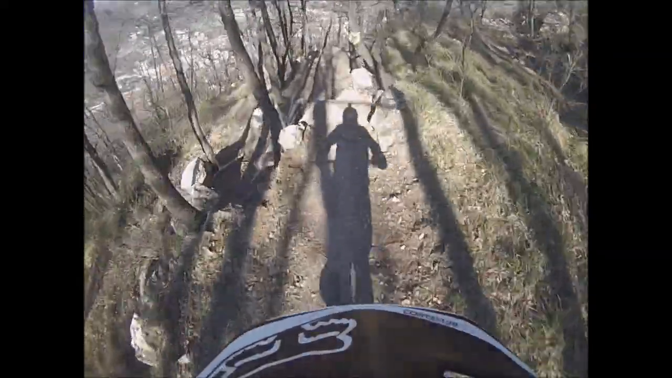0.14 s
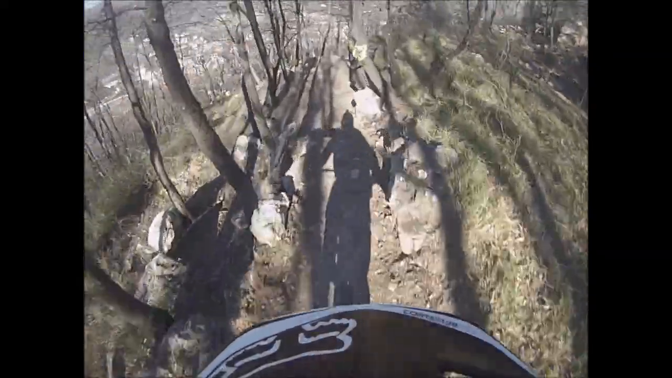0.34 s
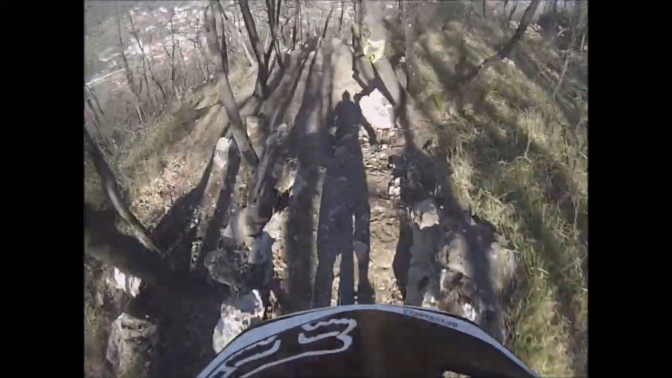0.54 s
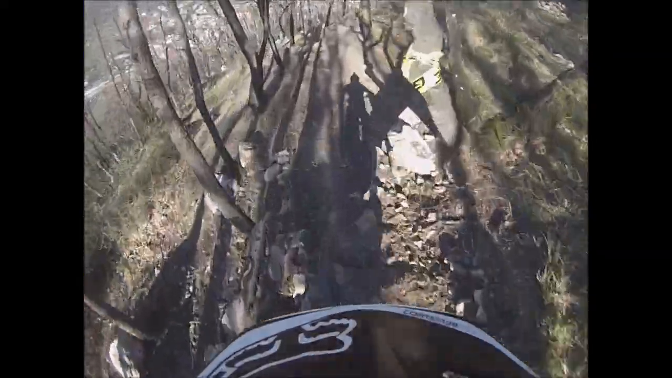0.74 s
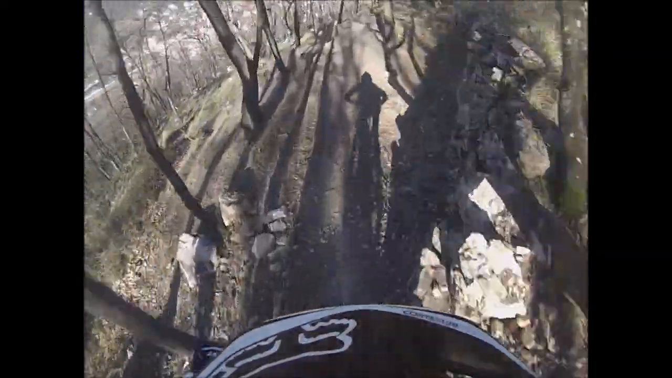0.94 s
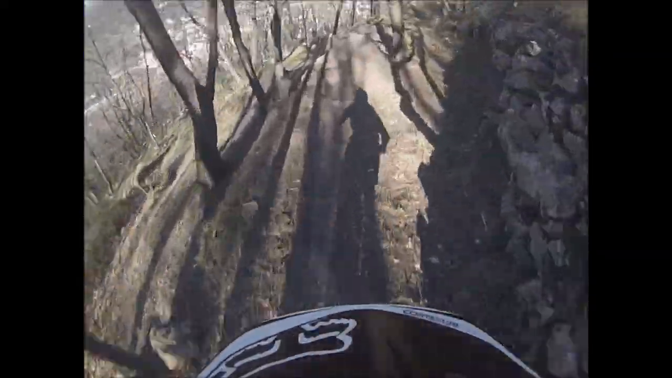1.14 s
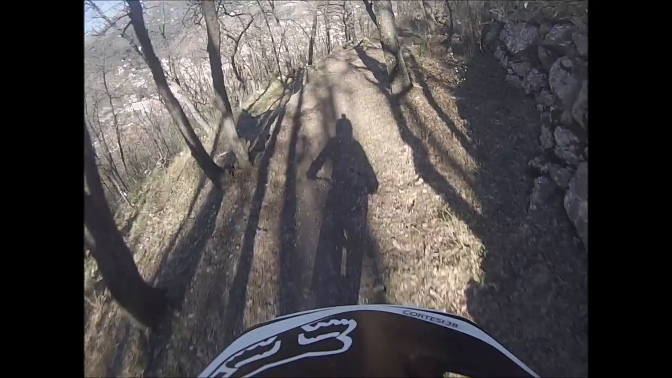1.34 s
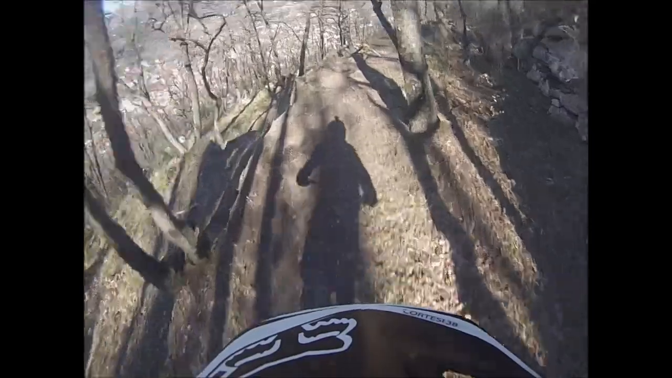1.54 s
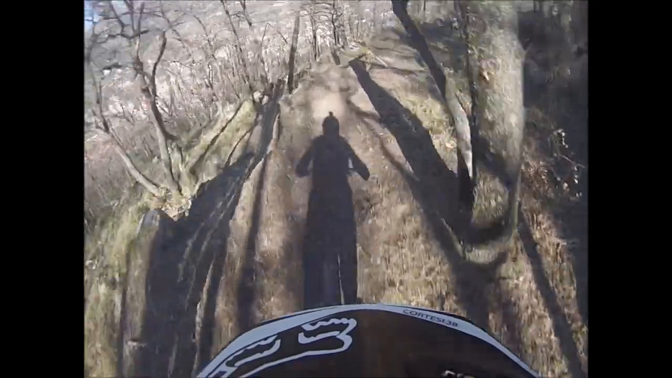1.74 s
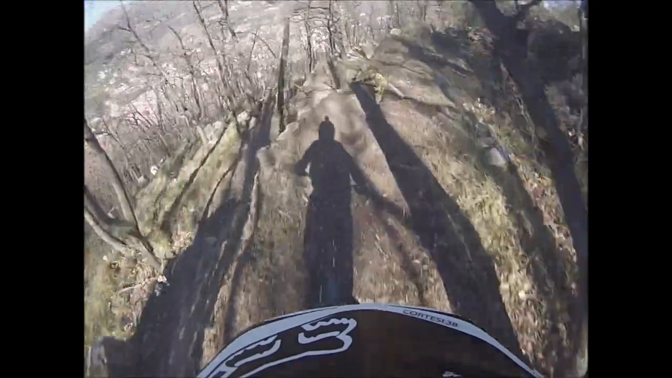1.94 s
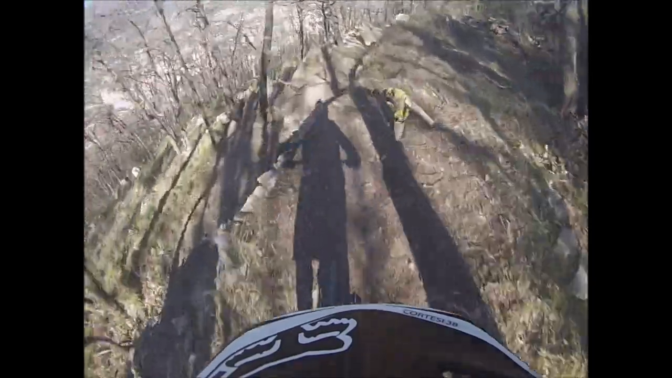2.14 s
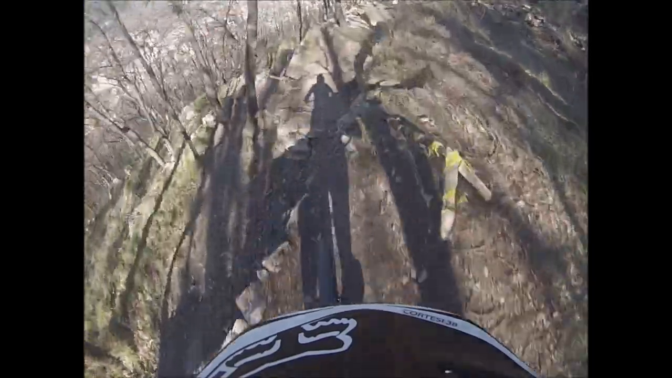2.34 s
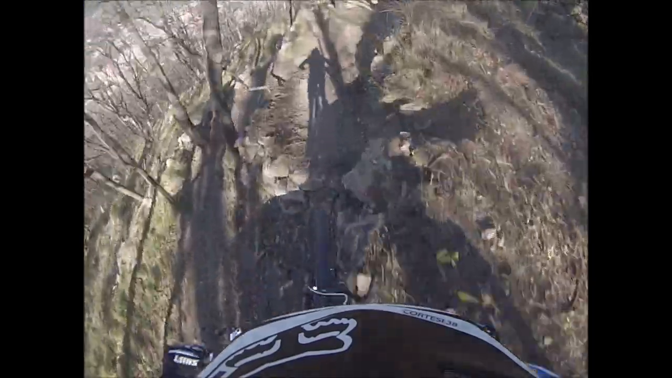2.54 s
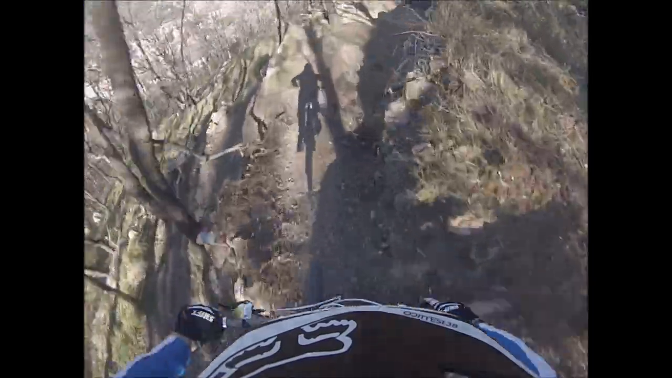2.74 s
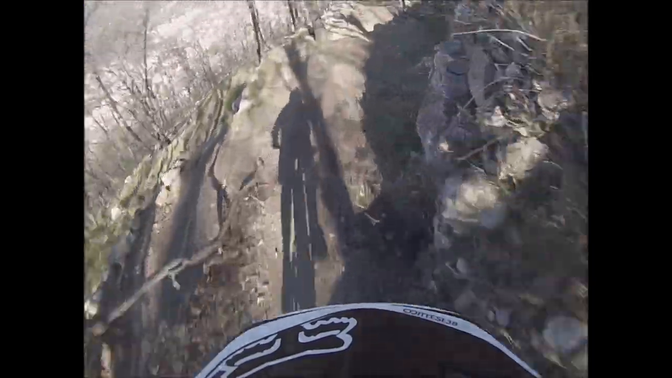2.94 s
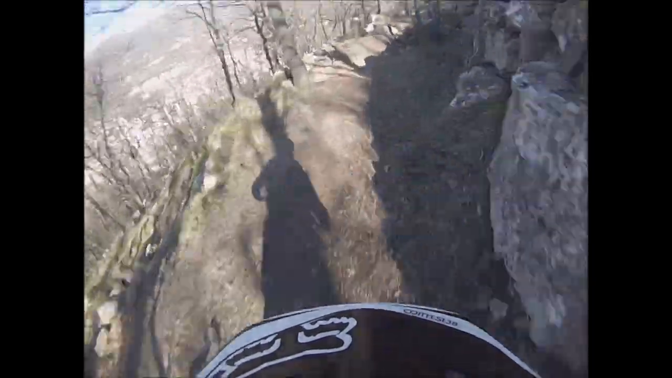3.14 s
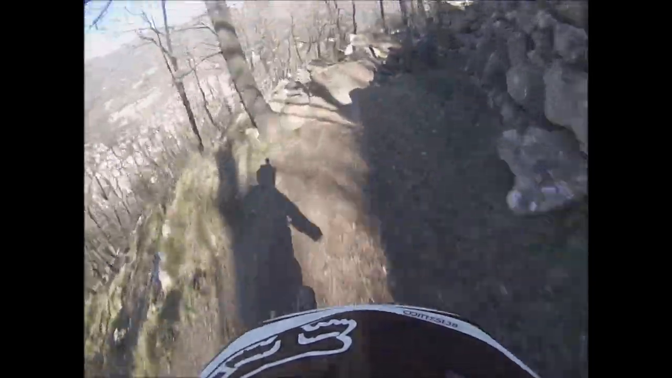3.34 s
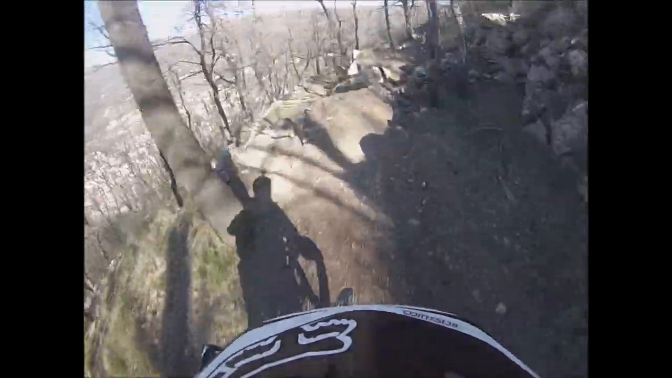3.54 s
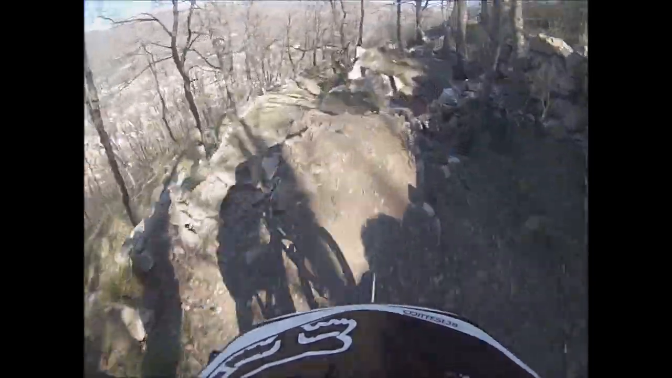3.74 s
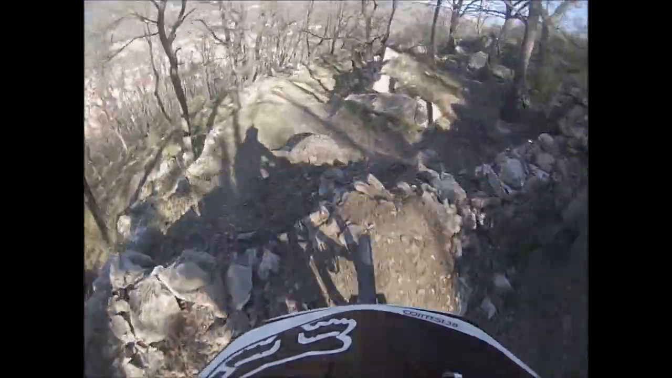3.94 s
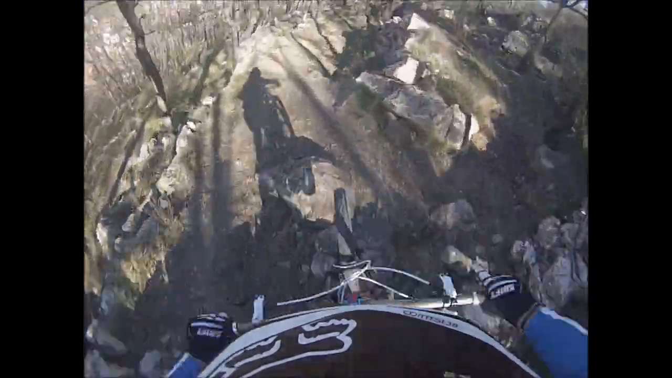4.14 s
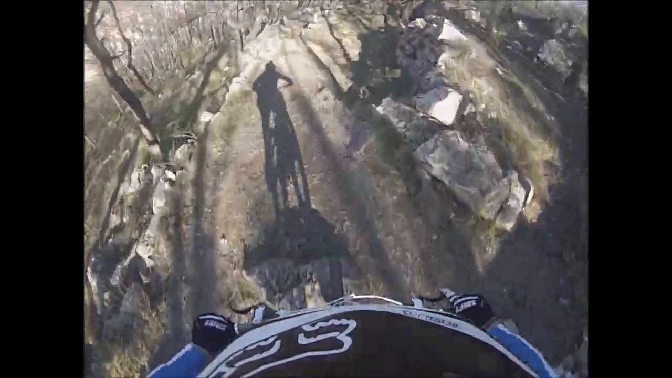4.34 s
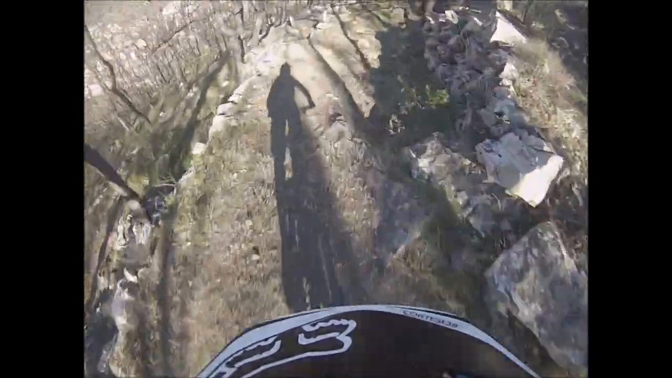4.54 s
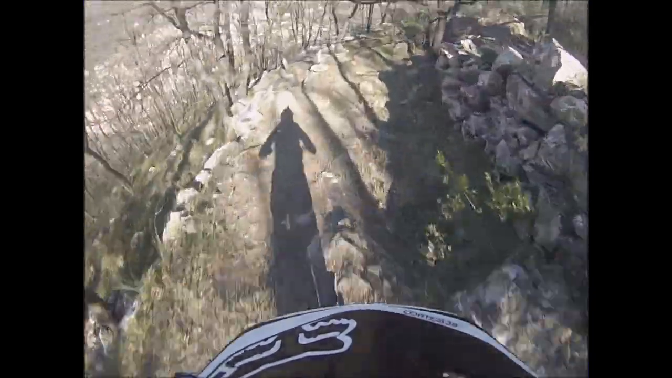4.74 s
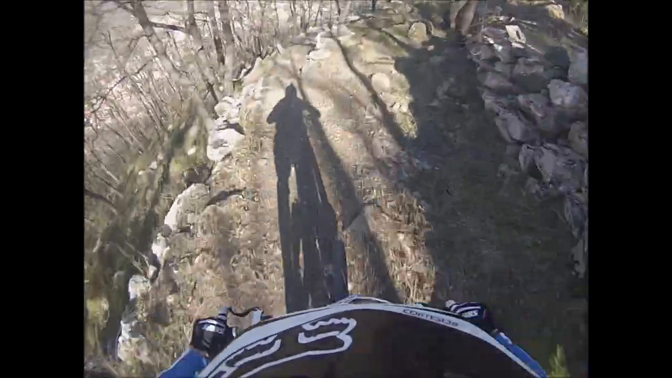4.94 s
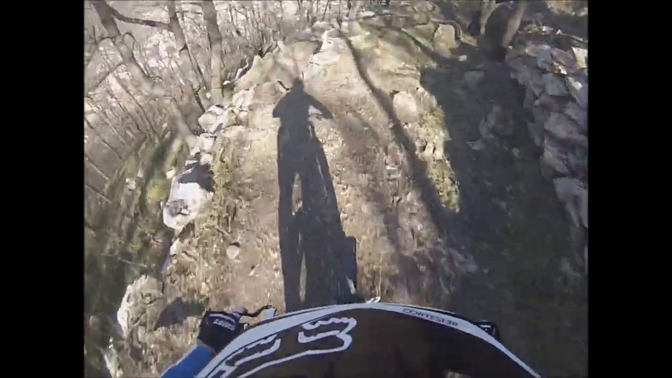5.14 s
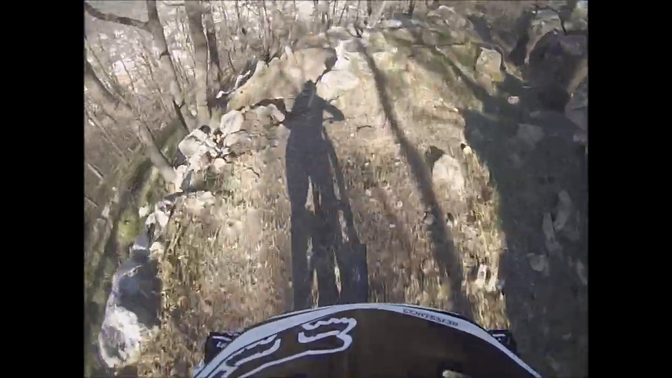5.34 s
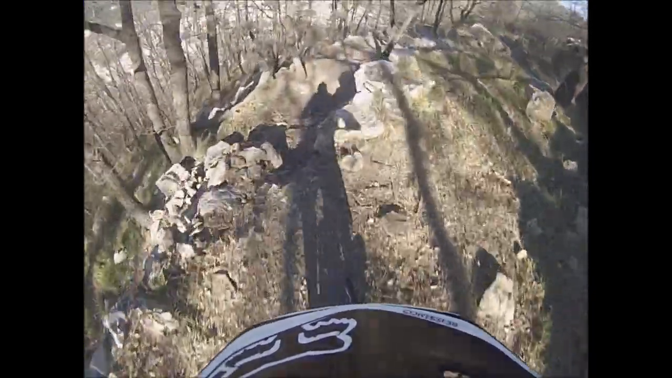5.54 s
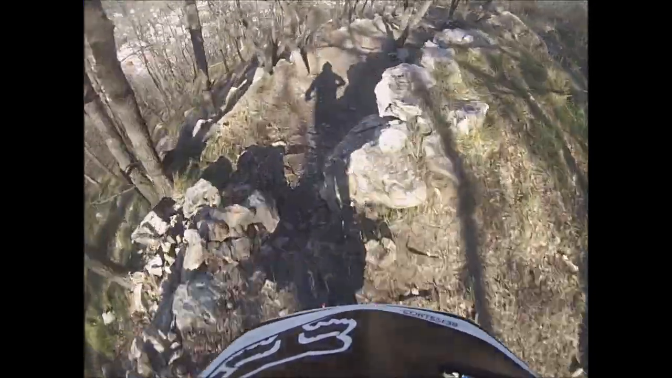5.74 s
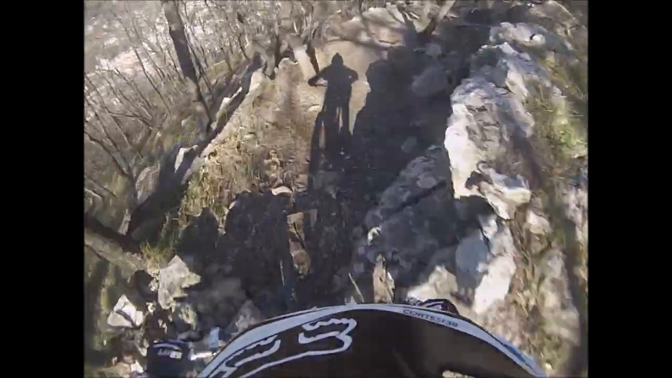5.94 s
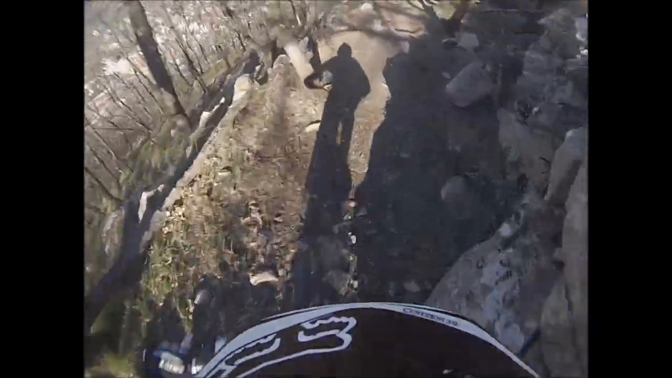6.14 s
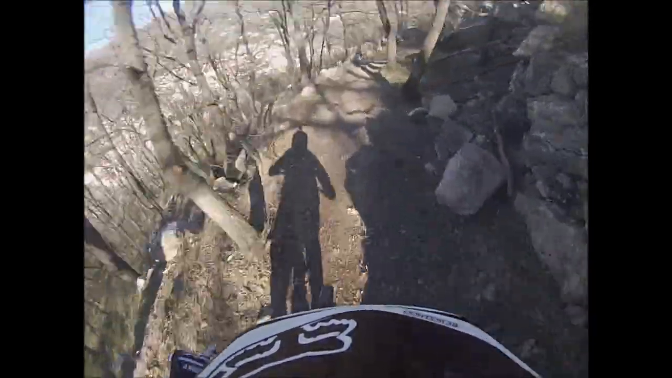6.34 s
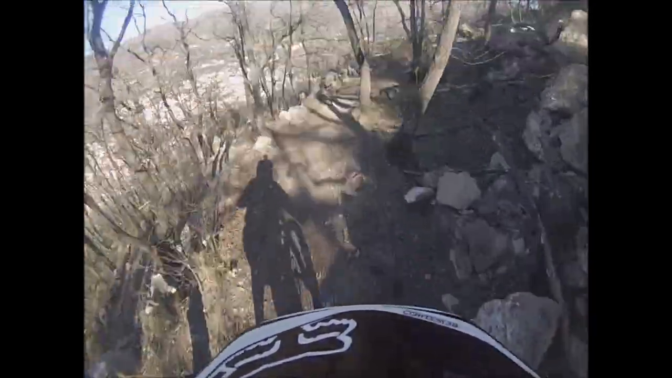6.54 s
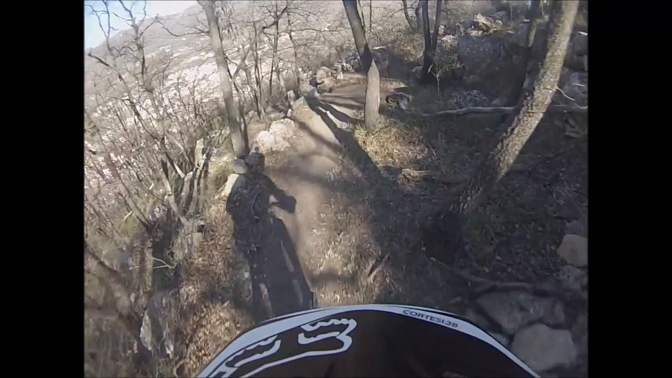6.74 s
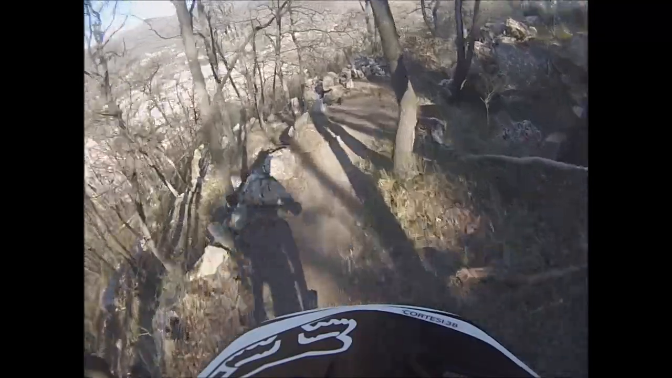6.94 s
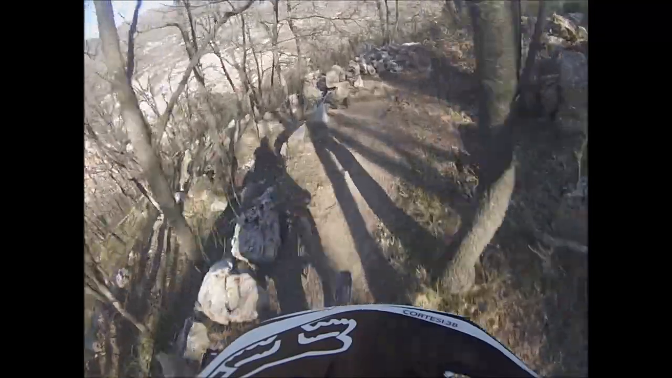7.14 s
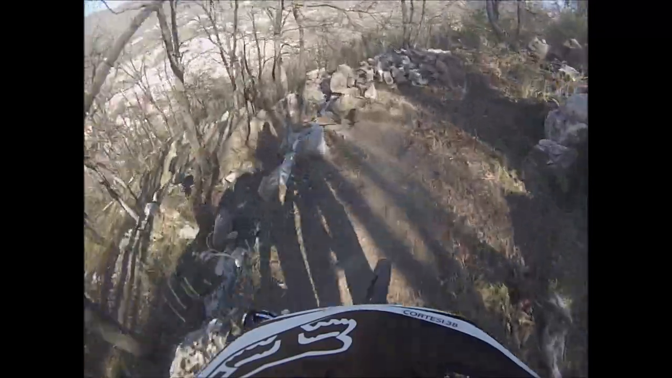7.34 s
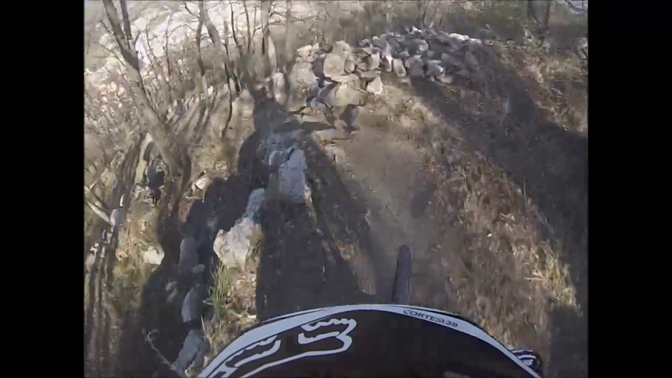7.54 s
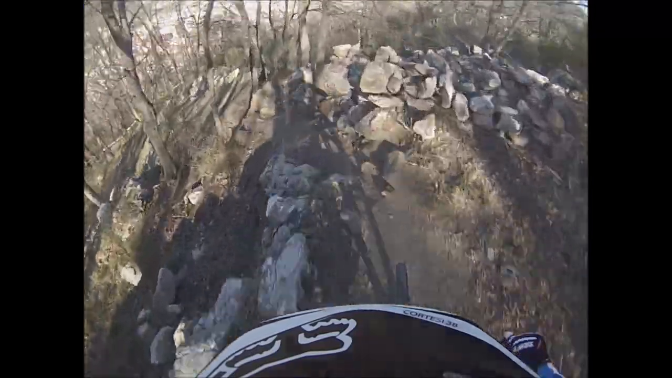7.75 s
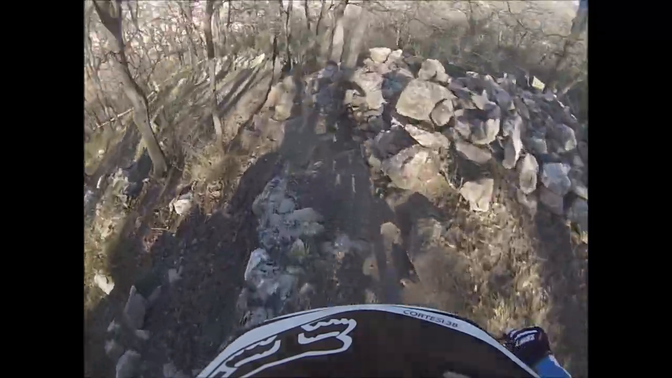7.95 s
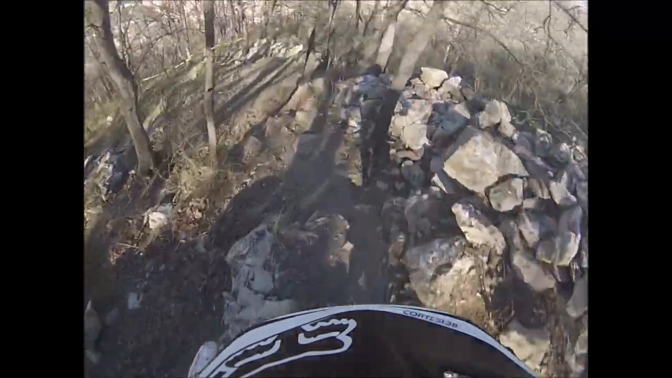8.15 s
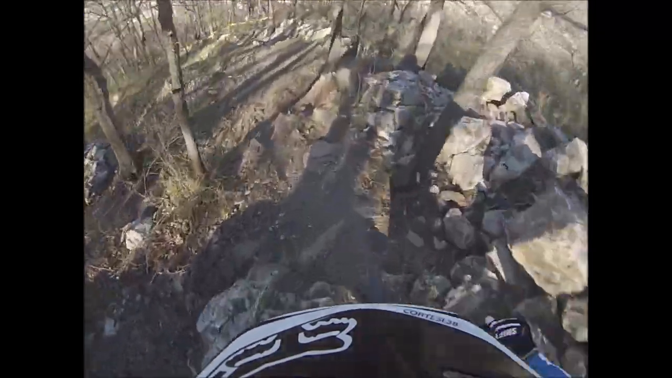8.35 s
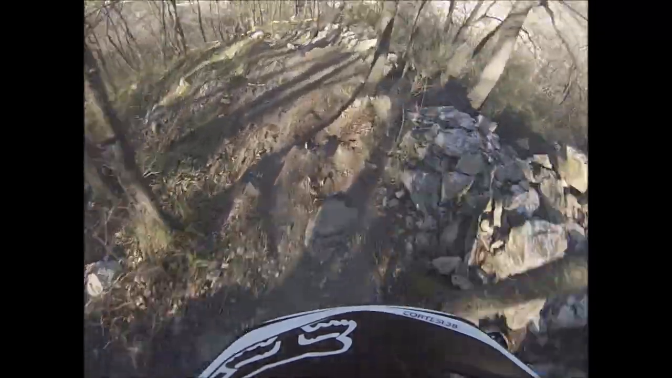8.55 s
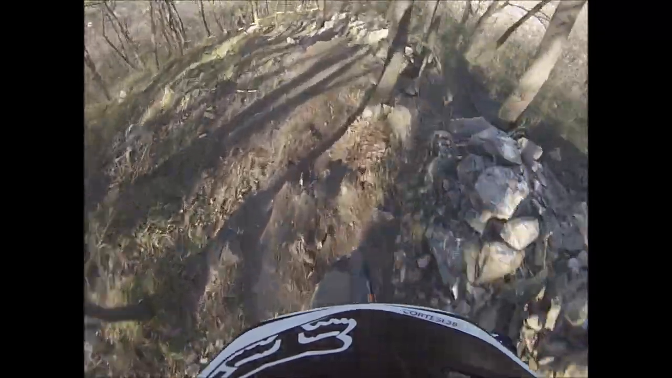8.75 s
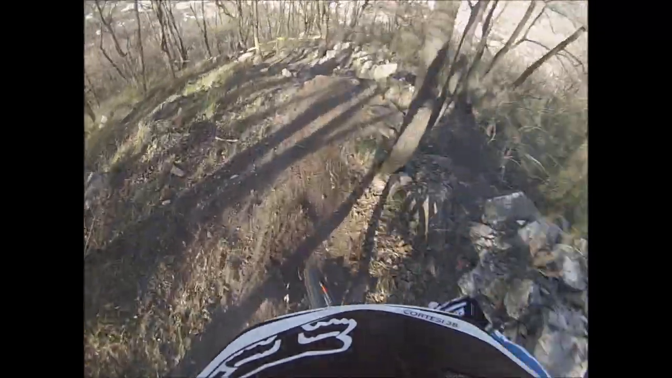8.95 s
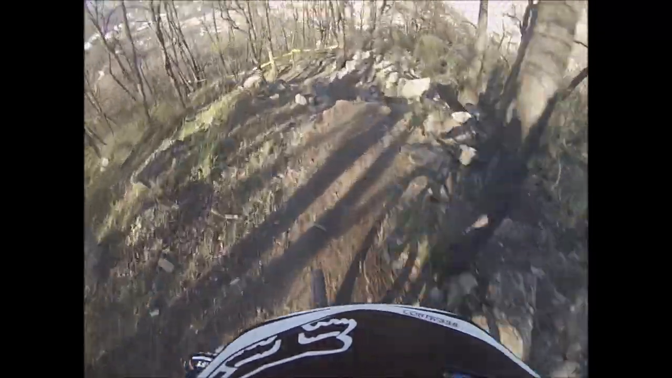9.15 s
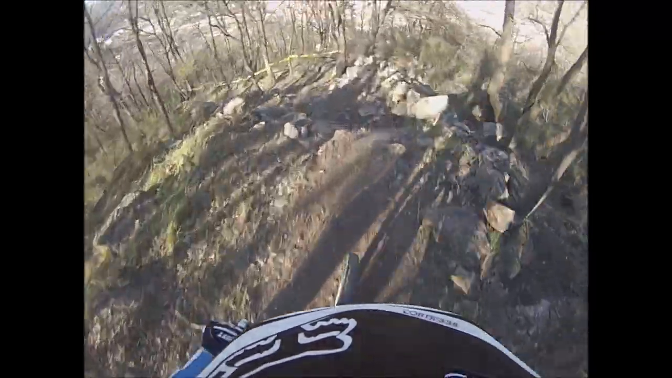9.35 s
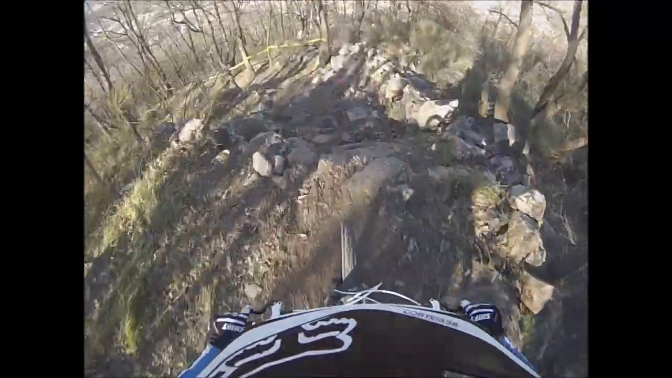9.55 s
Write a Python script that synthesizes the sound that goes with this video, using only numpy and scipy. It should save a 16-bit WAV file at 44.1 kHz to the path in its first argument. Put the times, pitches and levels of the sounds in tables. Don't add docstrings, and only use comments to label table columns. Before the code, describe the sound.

A mountain bike clatters down a rocky woodland trail, deep thuds and hard plasticky knocks jolting the rider's helmet camera over muffled tyre roar and wind.

```python
import sys
import numpy as np
from scipy import signal
from scipy.fft import rfft, irfft
from scipy.io import wavfile
from scipy.ndimage import uniform_filter1d

SR = 44100
rng = np.random.default_rng(int(sys.argv[2]) if len(sys.argv) > 2 else 0)


def makeup_ratio(level_db):
    decades = np.asarray(level_db, float) / 20
    return 10 ** decades


def generate_wav(signal):
    frames = np.transpose(np.atleast_2d(signal))
    scaled = np.clip(frames, -1, 1) * 32767
    pcm = np.round(scaled).astype(np.int16)
    wavfile.write(sys.argv[1], SR, pcm)


N = 427329


def rms_one(x):
    return x / np.sqrt(np.mean(x ** 2) + 1e-20)


def band(x, low_hz, high_hz, order=2):
    return signal.sosfilt(signal.butter(order, [low_hz, high_hz], "band", fs=SR, output="sos"), x + 1e-18)


def drift(rate):
    r = np.exp(-80 * np.pi * rate / SR)
    noise = rng.standard_normal(N // 40 + 2002)
    slow = signal.lfilter([1], [1, -2 * r, r * r], noise)[2000:]
    return np.interp(np.arange(N) / 40, np.arange(len(slow)), rms_one(slow))


def add(out, s, piece):
    i = max(round(s * SR), 0)
    out[i:i + len(piece)] += piece[:N - i]


def in_time(rows):
    s, *columns = np.transpose(rows)
    return [np.interp(np.arange(N) / SR, s, c) for c in columns]


def add_swings(curve_db, spans, taper):
    for middle_s, length_s, change_db in spans:
        swing = change_db * signal.windows.tukey(round(length_s * SR), taper)
        add(curve_db, middle_s - length_s / 2, swing)


def narrow_hiss(spans, low_hz, high_hz):
    gate = np.zeros(N)
    for s, length_s, level_db in spans:
        add(gate, s, makeup_ratio(level_db) * np.hanning(round(length_s * SR)))
    return gate * makeup_ratio(2 * drift(120)) * rms_one(band(rng.standard_normal(N), low_hz, high_hz))


# start_s, level_db, gravel_looseness_db
RIDE = [(0, -53.5, 1), (.42, -57, -1.5), (1.1, -48.5, 1), (1.55, -60, -0.5), (1.86, -50.5, 1.5),
        (2.4, -54.5, 0.5), (2.9, -53, 1), (3.3, -55, 0), (3.85, -57, 0.5), (4.2, -67, 2.5), (4.5, -57, 1.5),
        (5.15, -57.5, -2), (5.5, -73.5, -6.5), (6.2, -54, 0.5), (6.6, -69.5, -4.5), (7.5, -56, 2.5),
        (8.4, -67, -2), (9.69, -61.5, 0.5)]
# middle_s, length_s, roar_change_db
SCRAPES = [(1.085, 0.092, -3.5), (2.742, 0.076, 7.5), (2.916, 0.23, 7.5), (1.02, 0.063, 5.5),
           (4.997, 0.06, 6), (2.948, 0.081, 3.5), (5.121, 0.037, -8.5), (5.173, 0.047, 2),
           (8.287, 0.024, -4.5), (8.417, .015, 12), (3.263, 0.23, -4.5), (4.141, 0.054, 5.5),
           (4.388, 0.2, 8), (4.554, 0.04, 18.5), (4.598, 0.037, 10), (4.46, 0.017, 12), (4.748, 0.11, 2),
           (5.83, 0.046, 4), (5.925, 0.06, 9.5), (6.089, 0.079, 13), (6.065, 0.092, 7), (8.262, .025, 4.5),
           (6.174, 0.051, 7), (6.31, 0.066, -4.5), (6.852, 0.32, 6), (7.108, 0.11, -8), (7.553, 0.14, -6),
           (7.818, 0.14, 5.5), (7.955, 0.1, -6), (8.237, 0.33, 8), (8.409, 0.065, -12), (8.642, 0.4, 6),
           (8.823, 0.066, 10), (9.2, 0.025, 11.5), (9.332, 0.15, -4.5), (9.371, 0.026, 10),
           (9.44, 0.1, -5.5), (9.493, 0.16, 3.5)]
# middle_s, length_s, grit_change_db
SLIDES = [(2.939, 0.12, 4), (4.348, .1, -3.5), (4.549, 0.032, -0.5), (4.763, 0.079, 9), (6.064, 0.055, 1.5),
          (6.22, 0.15, 4), (6.347, 0.084, 10.5), (6.545, 0.032, 8), (7.602, 0.87, -3)]
GRIT_DB, GRIT_FOLLOWS, SCRAPE_GRIT_FOLLOWS = -72, 0.65, 0.56
SKIP_DB_PER_DB, SKIP_FROM_DB, SKIP_S = 0.3, -33, 0.058


def ground():
    ride_db, loose_db = in_time(RIDE)
    quick_db = np.zeros(N)
    add_swings(quick_db, SCRAPES, .35)
    add_swings(loose_db, SLIDES, .5)
    t = np.arange(SR // 3) / SR / SKIP_S
    sag = t ** 2 * np.exp(2 - 2 * t)
    for s, knock_db, *_ in SLAMS:
        add(quick_db, s, -SKIP_DB_PER_DB * max(knock_db - SKIP_FROM_DB, 0) * sag)
    grit_db = GRIT_DB + GRIT_FOLLOWS * (ride_db + 57.5) + SCRAPE_GRIT_FOLLOWS * quick_db + loose_db
    return ride_db + quick_db, grit_db


SCRAPE_BODY_FOLLOWS = 0.63


def roar(level_db, bright_db, patchy_db=1.33, grit_db=0.5):
    grains = rng.standard_normal((2, N))
    grains = grains * makeup_ratio(grit_db * np.minimum(rng.exponential(1, (2, N)), 4))
    stones_per_s = 60 * makeup_ratio(0.6 * (level_db + 48.5))
    stones = rng.random(N) < stones_per_s / SR
    stones = stones * makeup_ratio(16 + 4.5 * rng.exponential(1, N).clip(0, 3)) * rng.choice([-1, 1], N)
    grains = rms_one(grains) + stones
    together = drift(28)
    out = 0
    for k, low_hz in enumerate(100 * 2. ** np.arange(0, 6.5, .5)):
        half_octave = band(grains[k % 2], low_hz, np.sqrt(2) * low_hz)
        drive_db = level_db
        if k < 4:
            drive_db = .75 * uniform_filter1d(level_db + 56.5, size=SR // 5) - 58.5
        elif k < 7:
            steady_db = uniform_filter1d(level_db, size=SR // 3)
            drive_db = SCRAPE_BODY_FOLLOWS * level_db + (1 - SCRAPE_BODY_FOLLOWS) * steady_db
        elif k >= 10:
            drive_db = bright_db + 20
        flicker_db = patchy_db * (0.88 * together + 1.3 * drift(6.5))
        out = out + half_octave * makeup_ratio(drive_db + flicker_db)
    air_db = 0.7 * bright_db - 3.5 + gain_control() + 1.2 * together
    return out + band(rng.standard_normal(N), 9100, 13000, order=1) * makeup_ratio(air_db)


# pitch_hz, level_db (per Hz)
CASE = [(100, -4), (210, 2), (350, 0.5), (480, -13.5), (870, -5.5), (985, -18), (1250, -12), (1400, -1.5),
        (1630, -0.5), (1900, -5), (2500, -3.5), (3150, -25), (4400, -31), (4750, -36), (8500, -47)]
# centre_hz, width_hz, lift_db
WALLS = [
    (2570, 110, -3),
    (3370, 97, 3),
    (3534, 60, -8),
    (3634, 160, 6.5),
    (4300, 140, 3.5),
    (5220, 150, 6),
    (5860, 340, 5),
    (7400, 620, 4),
]


def through_case(x):
    size = 8192
    hz = np.maximum(np.arange(size // 2 + 1) * SR / size, 1)
    case_hz, case_db = np.transpose(CASE)
    level_db = np.interp(np.log(hz), np.log(case_hz), case_db)
    for centre_hz, width_hz, lift_db in WALLS:
        level_db = level_db + lift_db / (1 + (2 * (hz - centre_hz) / width_hz) ** 2)
    cepstrum = irfft(np.log(makeup_ratio(level_db)))
    cepstrum[1:size // 2] *= 2
    cepstrum[size // 2 + 1:] = 0
    response = irfft(np.exp(rfft(cepstrum)))
    response /= np.sqrt(np.sum(band(response, 1200, 3000) ** 2))
    return signal.fftconvolve(x, response)[:N]


# start_s, knock_db, push_db, jolt_db, ring_hz
SLAMS = [(0.949, -17, -19.5, -2.5, 71.4), (1.284, -29, -40, -3, 75.3), (1.406, -24.5, -19.5, -4, 84),
         (2.784, -18.5, -18, -20, 111), (3.004, -22.5, -24.5, -8, 89), (3.163, -38.5, -51, -12.5, 89),
         (4.453, -15.5, -19, -6, 88), (4.496, -27.5, -32.5, -28, 78), (4.652, -34, -42, -7.5, 76),
         (4.681, -30.5, -60, -17, 89), (4.875, -33.5, -34, -5, 87), (4.927, -28.5, -22.5, -12.5, 65),
         (4.964, -20, -20.5, -6, 73), (5.258, -24.5, -17, -5.5, 63), (5.942, -21, -25, -3, 83),
         (6.161, -28.5, -24.5, -7, 90.4), (6.365, -40, -28, -16.5, 58), (6.382, -22, -17.5, -12, 77.5),
         (6.413, -40.5, -31, -11.5, 99.4), (8.203, -30, -26, -3, 79.7), (8.228, -30, -30, -10.5, 54),
         (8.307, -19.5, -14.5, -13.5, 60.4), (8.672, -34.5, -33, -8, 87), (8.924, -15, -15, -8, 74.3)]
# edge_db (against the knock), push_cycle_ms, mount_lag_ms
SLAM_CONTACT = [(-18, 7.6, 5.1), (-8.5, 15, 5.9), (-9, 3.04, 3), (-13, 6.9, 3.3), (-12.5, 4.7, 0.63),
                (-12, 8.2, 1.2), (-14, 5.96, 2.8), (-9.5, 3, 1.9), (-6, 4.5, 0.32), (-5, 4.5, 2.5),
                (-9, 4, 0.33), (-11, 4.1, 2.2), (-16, 5, 4.65), (-14, 4.96, 7.9), (-19, 6.2, 3.2),
                (-12.5, 3.96, 3.57), (-19, 4.8, 1.9), (-14.5, 4.1, 5), (-7, 2.7, 2.7), (-13.5, 5.9, 3.4),
                (-13, 4.3, 2.4), (-15.5, 3.35, 5.5), (-14, 3.8, 3.5), (-21.5, 5.02, 2)]
# start_s, knock_db, jolt_db, ring_hz, t60_s
THUMPS = [(0.663, -32, -17.5, 78, 0.15), (0.825, -33, -20.5, 72.3, 0.22), (2.563, -31.5, -16.5, 70.2, 0.33),
          (2.684, -41.5, -14, 73, 0.18), (3.086, -36, -6, 69, 0.089), (3.248, -37, -34, 76, 0.18),
          (4.28, -24.5, -15, 73.2, 0.31), (4.778, -29, -19.5, 76.4, 0.11), (5.034, -23, -24, 72.3, 0.3),
          (5.368, -34.5, -26.5, 74.5, 0.3), (5.417, -33.5, -24, 72.6, 0.15), (5.524, -37.5, -26, 73, 0.11),
          (5.73, -30.5, -15, 77.6, 0.05), (6.1, -21.5, -31, 74.5, 0.11), (6.621, -33.5, -22, 71, 0.075),
          (6.72, -37.5, -24.5, 78, 0.45), (7.046, -45, -26.5, 77.3, 0.17), (7.177, -43, -25.5, 78, 0.1),
          (7.357, -27.5, -15, 74.3, 0.26), (8.365, -38, -32, 73, 0.16), (8.576, -24, -16.5, 75, 0.2),
          (9.197, -44.5, -19.5, 98, 0.042), (9.286, -33, -24, 71, 0.17), (9.523, -35, -21.5, 75, 0.15)]
# start_s, jolt_db, ring_hz, t60_s
BUMPS = [(.156, -26, 72, 0.2), (0.739, -26.5, 83.5, 0.15), (1.153, -20, 73, 0.4), (1.203, -24, 61.2, 0.71),
         (1.507, -25.5, 73, 0.19), (2.29, -23.5, 73.5, 0.18), (2.807, -7.5, 67.5, 0.097),
         (2.973, -21.5, 61.7, 0.54), (3.279, -13, 64, 0.069), (3.402, -19.5, 81, 0.21),
         (3.741, -20.5, 63, 0.075), (3.871, -20.5, 61, 0.12), (4.005, -26, 67, 0.13), (4.146, -24, 80, 0.1),
         (4.314, -25, 70.4, 0.34), (4.396, -20.5, 77.5, 0.16), (4.622, -19.5, 82.6, 0.063),
         (4.829, -9, 73, 0.1), (4.904, -24, 88, 0.029), (5.172, -15.5, 85.5, 0.077), (5.321, -25, 92, 0.32),
         (5.994, -19.5, 73, 0.14), (6.077, -5.5, 81.6, 0.046), (6.128, -16, 68.6, 0.3),
         (6.287, -13.5, 64.5, 0.11), (7.892, -31, 81.3, 0.29), (8.592, -13, 68.5, 0.063),
         (8.646, -14, 81, 0.022), (9.061, -15.5, 84, 0.084), (9.221, -19, 68.7, 0.14),
         (9.269, -36.5, 53.7, 1), (1.465, -24.5, 70, 0.11), (1.752, -34.5, 72.5, 0.25),
         (2.089, -31, 74, 0.18), (2.453, -29.5, 73, 0.17), (5.111, -22, 71, 0.16),
         (7.558, -36.5, 77.6, 0.3), (8.255, -32, 70, .12), (8.531, -24.5, 75, .15), (8.798, -24, 79, 0.13)]
RING_T60_S, RING_DB_PER_DB, RING_MAX_S = 0.07, .5, 0.48
THUMP_LAG_S = 0.00537
OVERTONE_HZ, OVERTONE_DB, OVERTONE_T60_S = 197, -17, 0.22
BOTTOM_HZ, BOTTOM_DB, BOTTOM_T60_S = 143, -7.5, 0.037
LINGER_DB, LINGER_T60_S = -18.5, 0.26
DEEP_HZ, DEEP_DB, DEEP_T60_S = 34, -21, .12


def jolts():
    slams = []
    for (s, _, _, db, hz), (*_, lag_ms) in zip(SLAMS, SLAM_CONTACT):
        t60_s = min(RING_T60_S * makeup_ratio(-RING_DB_PER_DB * (db + 4.5)), RING_MAX_S)
        slams.append((s + lag_ms / 1000, db, hz, t60_s))
    thumps = [(s + THUMP_LAG_S, db, hz, t60_s) for s, _, db, hz, t60_s in THUMPS]
    struck = slams + thumps + list(BUMPS)
    overtones = [(s, db + OVERTONE_DB, OVERTONE_HZ, min(OVERTONE_T60_S, t60_s)) for s, db, _, t60_s in thumps]
    bottoms = [(s, db + BOTTOM_DB, BOTTOM_HZ, BOTTOM_T60_S) for s, db, *_ in slams]
    lingers = [(s, db + LINGER_DB, hz, LINGER_T60_S) for s, db, hz, _ in slams]
    nods = [(s, db + DEEP_DB, DEEP_HZ, DEEP_T60_S) for s, db, *_ in struck]
    return struck + overtones + bottoms + lingers + nods


# start_s, sway_db, mount_tremble_db
HEAD = [(0.0, -26, -55), (0.16, -38, -52), (1.46, -20.5, -43.5), (1.59, -32.5, -50), (2.43, -35.5, -46),
        (3.05, -30, -59), (3.48, -28, -37.5), (4.34, -31.5, -55.5), (4.61, -18, -36.5), (5.21, -26, -48.5),
        (5.67, -42.5, -55), (6.12, -19, -29.5), (6.74, -38.5, -51), (8.04, -32, -57), (8.23, -34, -27.5),
        (8.47, -35, -43.5), (8.61, -21, -41.5), (9.69, -38.5, -43.5)]
RING_HOLD = 1.52
LOAD_DB = -9.5


def mount():
    sway_db, tremble_db = in_time(HEAD)
    tremble = band(rng.standard_normal(N) * makeup_ratio(4.9 * drift(11.4)), 76.2, 83.8, order=1)
    sway = band(rng.standard_normal(N), 18.1, 39.1)
    sway = sway * uniform_filter1d(sway ** 2, size=SR // 12) ** 0.45
    rings = np.zeros(N)
    t = np.arange(SR // 2) / SR
    rise = 1 - np.exp(-t / .002)
    for s, peak_db, hz, t60_s in jolts():
        fall_db = 20 * (3 * t / max(t60_s, .03)) ** RING_HOLD
        add(rings, s, -makeup_ratio(peak_db - 3.5 - fall_db) * rise * np.sin(2 * np.pi * hz * t))
    for (s, *_, peak_db, _), (*_, lag_ms) in zip(SLAMS, SLAM_CONTACT):
        load = np.hanning(round((lag_ms + 2) * SR / 1000))
        add(rings, s - .001, makeup_ratio(peak_db + LOAD_DB) * min(lag_ms / 5, 1) ** 2 * load)
    return rings + makeup_ratio(tremble_db) * rms_one(band(tremble, 60, 126)) + makeup_ratio(sway_db - 8.5) * rms_one(sway)


DUCK_DB_PER_DB, DUCK_FROM_DB, DUCK_S = 0.83, -17, 0.35


def gain_control():
    loss_db = np.zeros(N)
    t = np.arange(SR) / SR
    for s, peak_db, *_ in jolts():
        i = round(s * SR)
        duck_db = -DUCK_DB_PER_DB * max(peak_db - DUCK_FROM_DB, 0) * np.exp(-t[:N - i] / DUCK_S)
        loss_db[i:i + SR] = np.minimum(loss_db[i:i + SR], duck_db)
    return uniform_filter1d(loss_db, size=400)


def preamp_hiss(shape):
    level_db = -81.5 + gain_control() + 1.5 * drift(15)
    return makeup_ratio(level_db) * rms_one(band(rng.standard_normal(shape), 300, 11500))


# start_s, push_db, push_cycle_ms
FLEXES = [(0.159, -45.5, 5), (.742, -45, 5.7), (.83, -41.5, 3.4), (1.94, -39, 2.1), (2.378, -45, 2.9),
          (2.69, -30.5, 3.5), (2.942, -39.5, 3.8), (3.257, -52, 5.6), (3.399, -42.5, 3.1),
          (3.507, -45, 2.6), (3.671, -43, 3.4), (4.307, -50, 3.9), (4.605, -43, 3.9), (4.7, -39, 10),
          (5.048, -36, 3.6), (5.074, -38, 3.7), (5.332, -39, 5.2), (6.133, -39, 3.6), (6.265, -35.5, 7.5),
          (6.497, -40.5, 3.5), (6.527, -44, 3.2), (8.336, -37, 3.3), (8.827, -47, 3.8), (9.37, -45, 3.8),
          (9.533, -40.5, 3.9)]
# start_s, knock_db, edge_db
CLACKS = [(0.685, -38, -67), (1.246, -34, -47), (1.455, -32.5, -49), (2.188, -36, -50), (2.836, -33, -46),
          (3.145, -26, -35), (3.87, -41.5, -55), (4.083, -41, -51), (4.533, -36, -58), (4.607, -44, -45),
          (4.632, -20, -31), (4.803, -33, -43), (4.862, -34.5, -38), (4.949, -32, -50), (5.062, -28.5, -46),
          (5.069, -34, -52), (5.267, -57, -40.5), (6.167, -42, -35), (6.354, -45, -58), (1.164, -34.5, -46),
          (1.94, -46, -48), (5.296, -38, -43), (5.443, -49.5, -59), (6.154, -31.5, -43), (6.267, -35, -51),
          (6.341, -37.5, -48), (6.395, -29.5, -43), (6.464, -47, -41.5), (6.67, -45, -62),
          (7.274, -41.5, -46.5), (8.329, -35, -60), (8.521, -39.5, -48.5), (8.619, -34.5, -53),
          (8.801, -29.5, -33.5), (8.961, -27, -42), (9.017, -46, -49.5), (9.468, -42, -48.5)]
# start_s, knock_db
PELLETS = [(1.218, -34), (1.2844, -32), (1.4051, -21), (1.423, -35), (3.3988, -39), (3.6807, -40),
           (3.738, -37.5), (4.1419, -38.5), (4.3934, -32.5), (4.5756, -30), (4.75, -54), (5.332, -45),
           (5.808, -41.5), (6.0614, -47), (6.1116, -24.5), (6.2789, -34), (6.486, -45), (6.848, -43),
           (8.046, -40), (8.155, -37), (8.6016, -40), (9.6602, -38)]
# push_db, edge_db (both against the knock), push_cycle_ms
THUMP_CONTACT = [(-7.5, -20, 3.2), (1, -32, 3.15), (1.5, -28, 3.1), (5, -19, 2.1), (4.5, -17, 2.9),
                 (-3.5, -14, 3.5), (1, -25, 3.3), (-7, -24, 3.3), (3.5, -20.5, 4.8), (0, -14.5, 7.4),
                 (7, -17.5, 3.9), (-5.5, -19, 6.3), (-9.5, -17, 4.3), (1, -23, 3.35), (-10.5, -15, 5.4),
                 (0.5, -25, 3.5), (-12, -23, 3), (-12, -10, 3.7), (-4, -25, 4), (4.5, -11, 5.5),
                 (3.5, -16.5, 3.5), (-9, -17, 4.2), (-3.5, -17, 5.7), (-6, -13.5, 5.7)]
SLAM_BODY_DB = [-1, -1, -1, 2, -6, -2, -1, 4, 1, 0, 2, 8, 3.5, 11, -4, 1, 13, -2, 5, 8, 4, -3, 3, 1]
THUMP_BODY_DB = [1, -8, -5, -1, 2, -6, -7, -3, 0, 1, 6, 2.5, 3.5, -10, -21, -3, -10, -2, -5, 0, 0, 2, -27,
                 1]
BODY_DB, PUSH_MS = -2, 5
CLACK_PUSH_DB = -8.5
PELLET_DB, PELLET_PUSH_DB, PELLET_EDGE_DB = -5, -15, -17.5
BUMP_KNOCK_DB, BUMP_PUSH_DB, BUMP_LEAD_S = -32, -27, .0029


def case_hits():
    hits = []
    for (s, db, push_db, *_), (edge_db, ms, _), body_db in zip(SLAMS, SLAM_CONTACT, SLAM_BODY_DB):
        hits.append((s, db, push_db, db + edge_db, ms, body_db))
    for (s, db, *_), (push_db, edge_db, ms), body_db in zip(THUMPS, THUMP_CONTACT, THUMP_BODY_DB):
        hits.append((s, db, db + push_db, db + edge_db, ms, body_db))
    for s, db, edge_db in CLACKS:
        hits.append((s, db, db + CLACK_PUSH_DB, edge_db, PUSH_MS, BODY_DB))
    for s, db in PELLETS:
        hits.append((s, db + PELLET_DB, db + PELLET_PUSH_DB, db + PELLET_EDGE_DB, PUSH_MS, BODY_DB))
    for s, db, *_ in BUMPS:
        edge_db = db + 2 * BUMP_KNOCK_DB
        hits.append((s - BUMP_LEAD_S, db + BUMP_KNOCK_DB, db + BUMP_PUSH_DB, edge_db, PUSH_MS, BODY_DB))
    for s, db, ms in FLEXES:
        hits.append((s, db - 10, db, db - 25, ms, BODY_DB))
    return hits


def knocks():
    contact, body, edge, push = np.zeros((4, N))
    t = np.arange(SR // 20) / SR
    for s, peak_db, push_db, edge_db, cycle_ms, body_db in case_hits():
        noise = rng.standard_normal(len(t))
        length_s = 0.0036 * makeup_ratio(2.5 * np.tanh(noise[2]))
        rebound_s = 0.0044 * makeup_ratio(1.6 * np.tanh(noise[3]))
        rebound = 0.25 * np.exp(-((t - rebound_s) / 0.0028) ** 2)
        shape = np.exp(-(t / length_s) ** 2) + rebound + 0.038 * np.exp(-t / 0.039)
        rough = makeup_ratio(peak_db - 9) * shape * noise / np.sqrt(np.average(noise ** 2, weights=shape ** 2))
        rough[:4] += 0.83 * makeup_ratio(peak_db)
        add(contact, s - .0004, rough)
        add(body, s - .0004, makeup_ratio(body_db) * rough)
        sharp = noise[::-1] / np.sqrt(np.average(noise[::-1] ** 2, weights=shape ** 4))
        add(edge, s - .0002, makeup_ratio(edge_db + 10.5) * shape ** 2 * sharp)
        cycles = 1000 * t / max(cycle_ms, 2)
        add(push, s - .0018, makeup_ratio(push_db + 12) * np.sin(2 * np.pi * cycles) * np.exp(-1.6 * cycles))
    hardest = edge ** 3 / np.max(edge ** 2)
    inside = band(body, 280, 800) - band(contact, 740, 2700)
    inside = inside + band(edge, 3100, 6900) + 1.4 * band(hardest, 7400, 16000)
    dull_push = band(band(push, 72, 330, order=1), 13, 400)
    return through_case(inside) + dull_push


# middle_s, length_s, loss_db
DROPOUTS = [
    (.385, .03, -8),
    (1.573, .035, -8),
    (7.908, .03, -10),
    (8.5, .03, -6),
]


def treble_dropouts(mix):
    loss_db = np.zeros(N)
    add_swings(loss_db, DROPOUTS, .5)
    treble = signal.sosfiltfilt(signal.butter(2, 4000, "high", fs=SR, output="sos"), mix)
    return mix - (1 - makeup_ratio(loss_db)) * treble


# start_s, peak_db, very_high_share_db
TICKS = [(0.9473, -50, -13), (1.1992, -65, -26), (1.22, -66, -16), (1.4037, -66, -9), (2.7826, -69, -18),
         (3.002, -58, -6), (3.144, -62, -10), (3.162, -59, -16.5), (3.3942, -69, -15), (3.9878, -67, -20),
         (4.142, -52, -18), (4.2812, -66, -19), (4.293, -48.5, -20), (4.453, -55, -32), (4.492, -59, -8),
         (4.6324, -62, -19), (4.6523, -55, -20), (4.6803, -61, -21), (4.8735, -51, -18), (4.9082, -58, -12),
         (4.9254, -56, -11), (4.972, -46.5, -8), (5.0584, -61, -14), (5.2609, -59, -12), (5.2702, -51, -5),
         (5.418, -61, -25), (5.5588, -67, -22.5), (6.0545, -63, -14), (6.0995, -55, -18),
         (6.1524, -56, -20), (6.1644, -62, -22), (6.249, -63, -21), (6.2881, -54, -9), (6.381, -55, -8),
         (6.4625, -51.5, -16), (8.227, -63, -17), (8.307, -49, -9.5), (8.331, -56, -15), (8.5195, -77, -15),
         (8.584, -62, -21), (8.6373, -64, -19), (8.6487, -60, -19), (8.8004, -69, -20), (8.9236, -56, -13),
         (9.0149, -66, -23), (9.4454, -59, -27)]
# start_s, length_s, peak_db
CHATTERS = [
    (8.313, 0.045, -59),
    (8.63, .045, -58.5),
    (1.15, .1, -66),
    (6.17, .1, -64),
    (4.63, .03, -60),
]
CHATTER_GAP_S = 0.0085


def chain(bright_db):
    clicks = rng.random(N) < 120 / SR
    clicks = clicks * makeup_ratio(bright_db + 8 + 3.2 * rng.exponential(1, N).clip(0, 3))
    high = .12 * clicks
    taps = [(*tick, 0) for tick in TICKS]
    for s, length_s, db in CHATTERS:
        taps += [(s + lag_s, db, -19, 1) for lag_s in np.arange(0, length_s, CHATTER_GAP_S)]
    bursts = rng.standard_normal((len(TICKS) + 100, 110))
    for (s, peak_db, high_db, loose), burst in zip(taps, bursts):
        tap = makeup_ratio(peak_db + 7.5 + 3 * loose * burst[0]) * rms_one(burst) * np.hanning(len(burst))
        add(clicks, s - .0014 + 0.0013 * loose * burst[1], tap)
        add(high, s - .0014, makeup_ratio(high_db) * tap)
    return band(clicks, 6980, 8450, order=3) + band(high, 10000, 13000, order=3)


# start_s, length_s, level_db
SKIDS = [
    (2.7, 0.12, -45),
    (3.7, 0.19, -52),
    (5.56, 0.15, -68.5),
    (6.71, 0.13, -59.5),
    (8.62, 0.15, -54),
]


def skidding_tyre():
    return narrow_hiss(SKIDS, 2230, 2370)


# start_s, length_s, level_db
SQUEAKS = [
    (7.725, .03, -86),
    (7.794, .026, -82),
    (9.575, .045, -78),
    (9.655, .025, -80),
]


def brake():
    return narrow_hiss(SQUEAKS, 13200, 13480)


def scene():
    level_db, bright_db = ground()
    total = through_case(roar(level_db, bright_db)) + mount() + knocks()
    total = total + chain(bright_db) + skidding_tyre() + brake()
    return total[None]


CEILING = 0.46


def roll_off(x):
    return signal.sosfilt(signal.butter(12, 15720, fs=SR, output="sos"), x)


def record(dry):
    full = treble_dropouts(dry + preamp_hiss(dry.shape))
    limited = band(CEILING * np.tanh(full / CEILING), 10, 19000, order=1)
    return roll_off(limited)


dry = scene()
out = record(dry)
generate_wav(out)
```